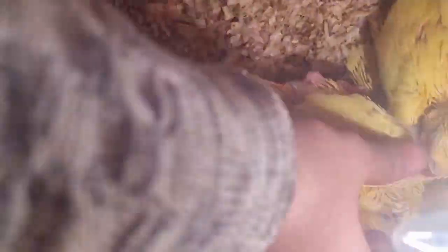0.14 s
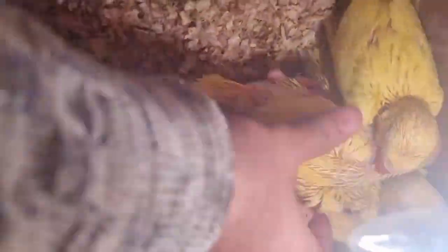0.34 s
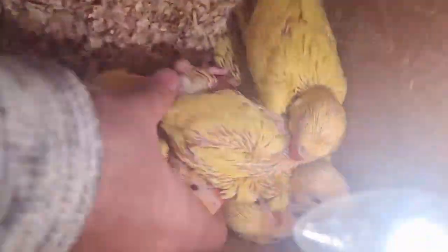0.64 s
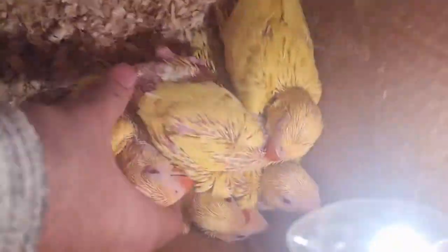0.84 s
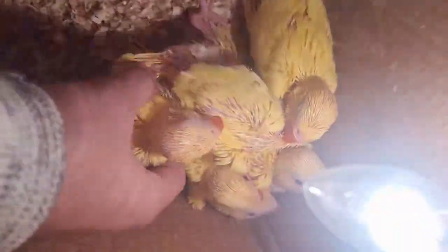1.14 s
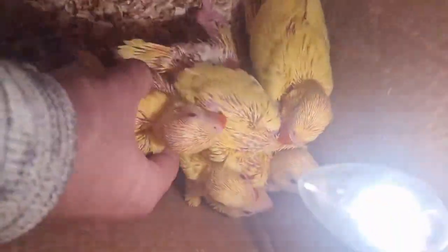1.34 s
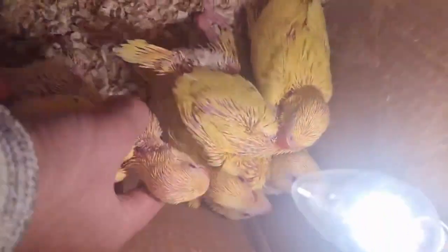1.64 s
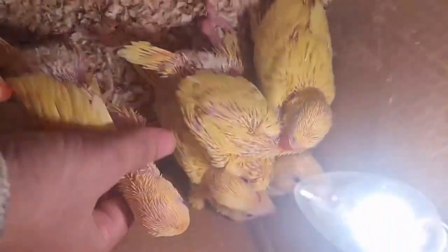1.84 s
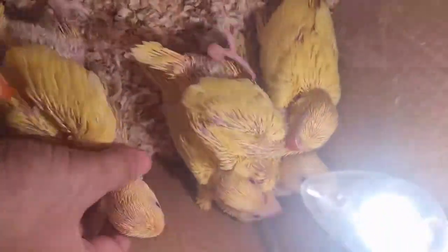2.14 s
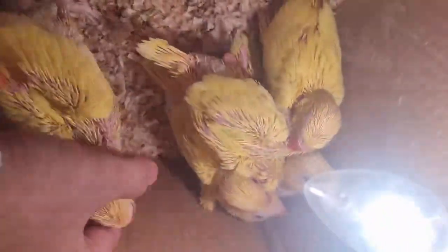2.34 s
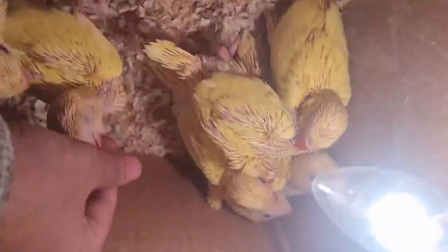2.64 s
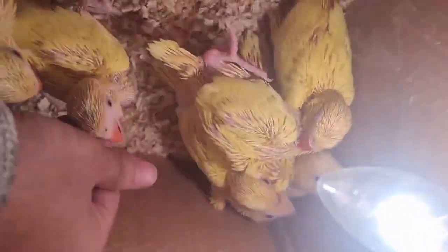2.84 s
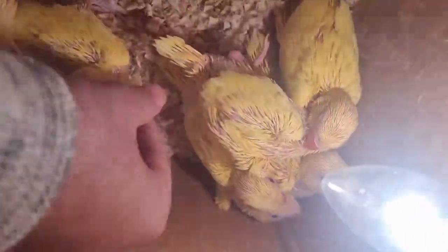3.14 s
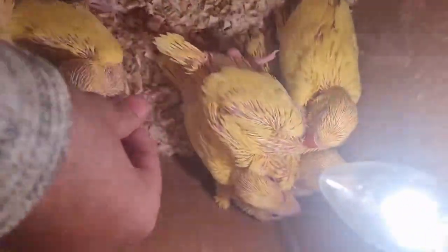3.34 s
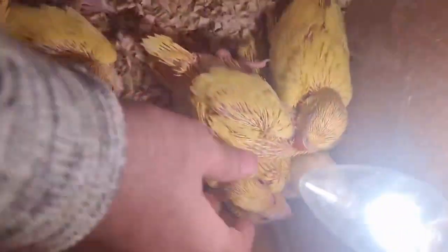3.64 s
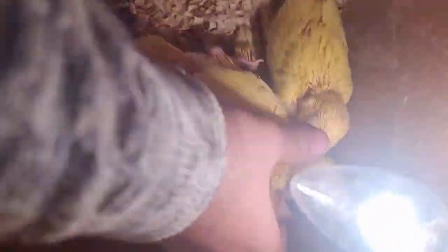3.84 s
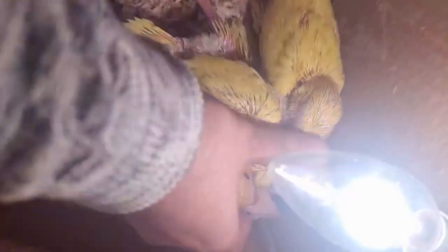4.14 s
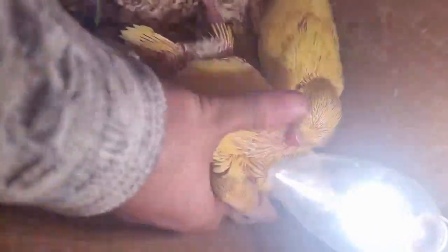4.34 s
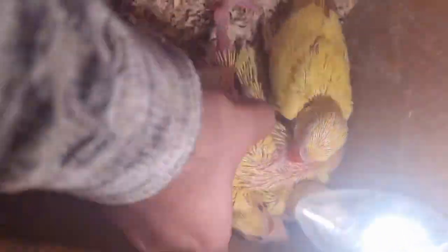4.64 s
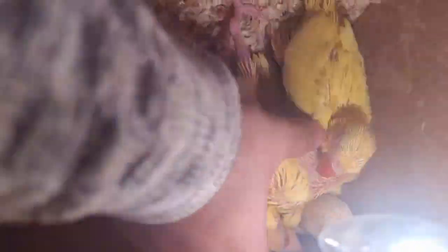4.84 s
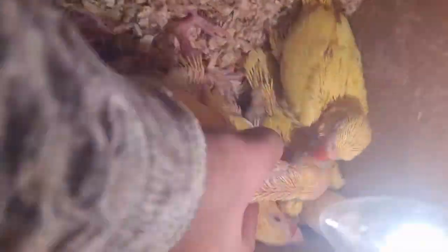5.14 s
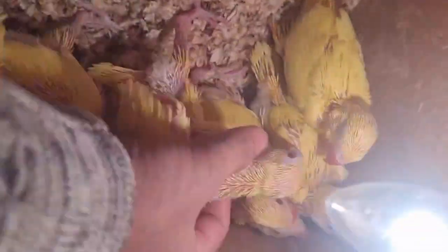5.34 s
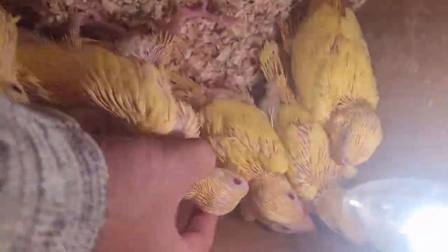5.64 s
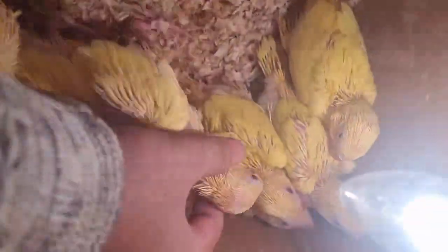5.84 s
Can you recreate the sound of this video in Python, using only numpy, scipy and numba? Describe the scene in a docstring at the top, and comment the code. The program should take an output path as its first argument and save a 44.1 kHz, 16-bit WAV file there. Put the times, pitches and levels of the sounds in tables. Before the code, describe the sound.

Parakeet chicks call harshly, one burst at a time, very near the phone in a small, nearly dry box. The first rasp ends before a cluster of dull wooden thumps and litter ticks. Two longer hoarse, buzzing calls follow, with thin wavering peeps from a nestmate before each. A quieter stretch of faint rustling leads to a thinner squeal breaking into creaks, soft bumps, and a last short call.

```python
"""A parakeet chick rasps close by, then a hand thumps the wooden nest box; hoarse, clear and squealing calls
follow. Chicks: membrane beats and breath through throat and box, with an echoed treble. Nestmate: wavering
near-sine peeps. Hand: decaying low sines, rattling panels and rumble. Shavings: noise bursts and stretches of
grainy noise. Room: quiet coloured noise. A hand-held stereo phone is near."""
import sys
import numpy as np
from scipy import signal
from scipy.fft import rfft, irfft, next_fast_len
from scipy.io import wavfile
from scipy.ndimage import uniform_filter1d
from numba import njit

SR = 44100
rng = np.random.default_rng(int(sys.argv[2]) if len(sys.argv) > 2 else 0)


def natural_amplitude(level_db):
    """Convert a level in decibels to a linear amplitude factor, elementwise."""
    exponent = np.asarray(level_db, float) / 20
    return 10 ** exponent


def inscribe(sig):
    """Save sig as 16-bit PCM at rate SR to the path in sys.argv[1].

    A 1-D sig is mono; a 2-D sig holds one channel per row.
    Samples are clipped to [-1, 1] before scaling.
    """
    pcm = np.round(np.clip(np.atleast_2d(sig).T, -1, 1) * 32767)
    wavfile.write(sys.argv[1], SR, pcm.astype(np.int16))


N = 264159
T = np.arange(N) / SR
SIZE = next_fast_len(N + 8192)
HZ = np.arange(SIZE // 2 + 1) * SR / SIZE


def on_hz(table, hz, column=1):
    """Spectrum column, interpolated linearly on a log-frequency axis."""
    rows = np.array(table, float)
    return np.interp(np.log(hz + 1), np.log(rows[:, 0] + 1), rows[:, column])


def unit(x):
    """Scale to rms 1."""
    return x / np.sqrt(np.mean(x ** 2))


def causal(db):
    """Minimum-phase response of a gain in dB, by folding its cepstrum."""
    cepstrum = irfft(db * np.log(10) / 20, SIZE)
    cepstrum[1:SIZE // 2] *= 2
    cepstrum[SIZE // 2 + 1:] = 0
    return np.exp(rfft(cepstrum))


def band(x, lo_hz, hi_hz):
    """Steep band-pass."""
    return signal.sosfilt(signal.butter(3, [lo_hz, hi_hz], "band", fs=SR, output="sos"), x)


def walk(rate_hz):
    """Random levels held 1 / rate_hz and slewed twice."""
    hold = int(SR / rate_hz)
    steps = np.repeat(rng.standard_normal(N // hold + 1), hold)
    return 1.33 * uniform_filter1d(uniform_filter1d(steps, hold), hold)[:N]


def spans(tables, column, edge_s=0.0013):
    """Gain of a dB column inside each table's span, silent between."""
    out = np.zeros(N)
    for rows in map(np.array, tables):
        fade = np.clip(np.minimum(T - rows[0, 0], rows[-1, 0] - T) / edge_s, 0, 1)
        out += fade * natural_amplitude(np.interp(T, rows[:, 0], rows[:, column]))
    return out


def box(x, wet_db, t60_s):
    """Close walls add a short tail, different at each microphone; it shifts as birds and phone move."""
    t = T[:int(t60_s * SR)]
    turn = 1.2 * walk(6)
    for share in (np.cos(turn), np.sin(turn)):
        tail = rng.standard_normal((2, 8192))[:, :len(t)] * natural_amplitude(-60 * t / t60_s) * np.minimum(t / 0.0084, 1)
        tail = natural_amplitude(wet_db) * tail / np.linalg.norm(tail, axis=1, keepdims=True)
        yield signal.fftconvolve(x * share, tail, axes=1)[:, :N]


# stereo likeness of diffuse sound: f/Hz, left-right correlation
ALIKE = [(60, 0.53), (130, 1), (290, 0.71), (640, -0.31), (1410, -0.49), (3100, 0.014), (6820, 0.06),
         (15000, 0.053)]


def pair(tone, excite):
    """Two unrelated excitations coloured and mixed to left/right: alike in the bass, opposed in the middle."""
    alike = np.clip(on_hz(ALIKE, HZ), -.99, .99)
    shares = np.sqrt([np.ones_like(alike), (1 - alike) / (1 + alike)])
    mid, side = rfft(excite, SIZE) * natural_amplitude(on_hz(tone, HZ)) * shares
    return irfft(np.array([mid + side, mid - side]), SIZE)[:, :N] / np.std(irfft(mid, SIZE))


# room noise spectrum: f/Hz, density/dB per Hz
ROOM_TONE = [(18, -33), (30, 9), (81, -5.5), (249, -0.5), (467, -20.5), (747, -11.5), (1200, -32),
             (1360, -30), (5740, -36), (7080, -30), (7860, -43.5), (14300, -39.5), (15500, -62)]
ROOM_DB = -57.5


def room():
    """Quiet air: coloured noise whose level flickers a little."""
    return pair(ROOM_TONE, rng.standard_normal((2, N))) * natural_amplitude(ROOM_DB + 1.2 * walk(9))


# claws and shavings: t/s, level/dB, treble/dB re level, t60/s, woody body/dB re level
TICKS = [(0.647, -52, -15, 0.012, 17), (0.748, -45.5, -11.5, 0.019, 14.5), (0.9141, -43, -10, 0.0088, 11.5),
         (0.9504, -30.5, -15, 0.0051, 8.5), (1.465, -68, -8, 0.013, 9), (3.1592, -42, -14.5, 0.037, 6),
         (3.176, -39, -12.5, 0.062, 8), (3.2027, -38, -8, 0.019, 14.5), (3.22, -59.5, -25, 0.23, 21),
         (4.575, -72, 6, 0.02, -4), (4.607, -66, -16, 0.014, 5), (4.631, -56, -16, 0.015, 2),
         (4.654, -54.5, -19, 0.012, 8), (4.682, -73, -14, 0.015, 2), (4.7077, -54, -17, 0.017, 6.5),
         (5.094, -60, -12, 0.0087, -18), (5.437, -44, -8, 0.022, 3), (5.5164, -47.5, -1.5, 0.028, 18.5),
         (5.671, -63, -6, 0.04, 0), (5.744, -61.5, 1, 0.027, 15)]
# tick spectrum: f/Hz, density/dB per Hz
TICK_TONE = [(1000, -5.5), (1700, 6.5), (2600, 10.5), (3100, -1.5), (3910, 6.5), (4540, -3.5), (7500, -5.5),
             (9750, -93), (16500, -120)]
# stretches of faint rustling noise: t/s, length/s, level/dB
RUSTLES = [(0, 0.0071, -48.5), (0.603, 0.32, -54.5), (0.98, 0.079, -69.5), (0.99, 0.46, -68),
           (1.581, 0.85, -60.5), (3.11, 0.28, -61), (4.365, 0.068, -60.5), (4.587, 0.13, -58.5),
           (4.854, 0.21, -66), (5.134, 0.59, -58), (5.873, 0.13, -61.5)]
# rustle spectrum: f/Hz, density/dB per Hz
RUSTLE_TONE = [(180, -53.5), (300, -4), (348, 0.5), (1280, -6.5), (1560, -6), (3450, -12.5), (4210, -12),
               (6900, -16.5), (9930, -30), (15500, -21)]
RUSTLE_RISE_DB_PER_S, RUSTLE_FALL_DB_PER_S = 255.5, 124


def shavings():
    """Short scratchy noise bursts, and stretches of faint rustling noise, rising and falling in level."""
    body, top, wood = np.zeros((3, N))
    for s, db, treble_db, t60_s, wood_db in TICKS:
        # each burst rises over a few milliseconds, then decays
        drop = np.where(T > s + .003, (T - s - .003) / t60_s, (s + 0.0024 - T) / 0.015)
        burst = natural_amplitude(db - 60 * drop)
        body += burst
        top += burst * natural_amplitude(treble_db)
        wood += burst * natural_amplitude(wood_db)
    grain_db = np.minimum(3 * rng.exponential(size=N), 11)
    crackle = rng.standard_normal((2, N)) * natural_amplitude(grain_db + 1.2 * walk(400))
    ticks = 1.61 * body * pair(TICK_TONE, crackle)
    ticks += top * unit(band(crackle, 8500, 15400))
    ticks += wood * unit(band(crackle, 260, 1230))
    grains = rng.standard_normal((2, N)) * natural_amplitude(grain_db + 2.4 * walk(20))
    rustle = np.zeros(N)
    for s, length_s, db in RUSTLES:
        rise_db = RUSTLE_RISE_DB_PER_S * np.maximum(s - T, 0)
        fall_db = RUSTLE_FALL_DB_PER_S * np.maximum(T - s - length_s, 0)
        rustle += natural_amplitude(db - rise_db - fall_db)
    return ticks + sum(box(ticks, -6.5, 0.039)) + rustle * pair(RUSTLE_TONE, grains)


# hand against the box: t/s, level/dB, ring f/Hz
THUMPS = [(0.227, -24.5, 105), (0.295, -28.5, 93), (0.879, -19, 85), (0.926, -13, 77), (0.949, -7.5, 88),
          (1.025, -27, 71.4), (3.173, -27, 81), (3.202, -16.5, 65), (3.776, -30, 68.98),
          (5.386, -27.5, 68.43), (5.441, -29.5, 100.5), (5.659, -25, 84.8)]
THUMP_T60_S = 0.11
RUMBLE_DB, SWELL_S, SWELL_WIDTH_S, SWELL_DB = -57, 6.1, 0.13, 8  # swell is centred past the end


def hand():
    """Soft blows ring the box panels low and set them rattling; a rumble runs under them."""
    ring, shake = np.zeros(N), np.zeros(N)
    for s, db, hz in THUMPS:
        t = np.maximum(T - s, 0)
        fade = natural_amplitude(db - 60 * t / THUMP_T60_S) * (1 - np.exp(-t / 0.0048))
        ring += fade * np.sin(2 * np.pi * hz * t)
        shake += np.sqrt(fade)
    rumble = natural_amplitude(3 * walk(14)) * unit(band(rng.standard_normal(N), 42, 125))
    swell_db = SWELL_DB * np.exp(-((T - SWELL_S) / SWELL_WIDTH_S) ** 2)
    rumble = rumble * natural_amplitude(RUMBLE_DB + swell_db)
    rattle = natural_amplitude(-34.0) * shake * unit(band(rng.standard_normal((2, N)), 160, 650))
    return band(ring + rumble, 26, 149) * natural_amplitude(np.array([[1.5], [-1.5]])) + rattle


# nestmate, one table a peep: t/s, pitch f/Hz, level/dB
PEEPS = [
    [(0, 794, -52), (.055, 848, -42)],
    [(1.945, 700, -61), (1.965, 859, -48), (2.005, 880.4, -45.5), (2.03, 943, -48.5), (2.135, 895, -49.5)],
    [(3.235, 860, -51), (3.275, 853, -48), (3.298, 743, -36.5), (3.31, 751, -48.5), (3.322, 825, -39),
     (3.333, 1065, -48), (3.35, 1016, -40.5), (3.374, 1102, -51), (3.388, 980, -49.5), (3.46, 955, -65)],
]
# upper partials at the start of each peep: level/dB re first partial
UPPER_DB = [-9, -3, -3]
# waver of each peep: roughness/0-1
PEEP_ROUGH = [.7, .4, .8]
UPPER_FADE_DB_PER_S, UPPER_FADE_S = 150, 0.038  # fade stops after UPPER_FADE_S


def nestmate():
    """Thin peeps: a wavering near-sine whose upper partials fade early in each peep."""
    rows = np.vstack(PEEPS)
    starts = np.array([p[0][0] for p in PEEPS])
    now = np.searchsorted(starts, T, "right") - 1
    age_s, rough = np.minimum(T - starts[now], UPPER_FADE_S), np.array(PEEP_ROUGH)[now]
    hz = np.interp(T, rows[:, 0], rows[:, 1]) * (1 + .025 * rough * walk(400))
    phase = 2 * np.pi * np.cumsum(hz) / SR
    upper = np.sin(2 * phase) + natural_amplitude(-20) * (np.sin(3 * phase) + np.sin(4 * phase))
    tone = np.sin(phase) + natural_amplitude(np.array(UPPER_DB)[now] - UPPER_FADE_DB_PER_S * age_s) * upper
    peep = np.sqrt(2) * (1 + .5 * rough * walk(250)) * spans(PEEPS, column=2, edge_s=.012) * tone
    peep = peep * natural_amplitude(np.array([[-1.5], [1.5]]))
    return peep + sum(box(peep, -7, .06))


@njit
def membrane(hz, cycles, weak, rough, chance, jitter, shimmer):
    """One beat a cycle, strong only every few cycles; rough cycles vary in length and size."""
    beats, glow = np.zeros(len(hz) + 1), np.zeros(len(hz))
    p, k, since, size = 0., 0, 0., 0.
    for i in range(len(hz)):
        step = hz[i] / SR * np.exp(jitter * rough[i] * chance[k, 0])
        p += step
        if p >= 1:
            p, k, since = p - 1, k + 1, since + 1
            size = np.exp(shimmer * rough[i] * chance[k, 1])
            if since > cycles[i] - chance[k, 2]:
                since = 0.
            else:
                size *= weak[i]
            # split between two samples for sub-sample timing
            beats[i] += size * p / step
            beats[i + 1] += size * (1 - p / step)
        glow[i] = size * np.exp(-3 * p)
    return beats[:-1], glow


# chicks, one table a call: t/s, membrane f/Hz, level/dB
CALLS = [
    [(.056, 759.4, -30.5), (.3, 792.7, -28.5), (.4, 880.7, -29), (.58, 868.6, -31), (.61, 820, -37.5),
     (.625, 793, -29), (.645, 804, -39)],
    [(2.075, 677, -43.5), (2.087, 682, -56)],
    [(2.132, 714.5, -39), (2.25, 743, -33), (2.43, 635.7, -30.5), (2.51, 753.3, -26.5), (2.64, 792, -26),
     (2.78, 720.2, -27.5), (2.93, 693, -27.5), (2.995, 812, -32), (3.035, 663, -33.5), (3.09, 618.4, -38.5),
     (3.116, 537, -43.5)],
    [(3.474, 787, -32), (3.5, 862, -26.5), (3.56, 672, -30.5), (3.78, 589.3, -26.5), (3.88, 567.2, -27),
     (4.01, 480, -30.5), (4.194, 444.4, -32), (4.2, 609, -39.5), (4.33, 571.6, -38.5), (4.36, 546.3, -36.5),
     (4.381, 495, -48.5)],
    [(5.174, 593.3, -37), (5.19, 690, -34.5), (5.203, 651, -34.5), (5.22, 752.7, -34), (5.27, 780.7, -34),
     (5.36, 727.7, -36), (5.4, 724.7, -39), (5.54, 718.7, -39), (5.565, 795, -34.5), (5.6, 835, -34.5),
     (5.64, 784.5, -33.5), (5.655, 708, -34.5), (5.7, 690, -39), (5.745, 561, -48.5)],
    [(5.928, 746, -36.5), (5.96, 683.4, -27.5), (5.99, 715, -31)],
]
# where each call comes from: seat index
CALL_SEAT = [0, 1, 1, 1, 1, 1]
# voicing from each moment on: t/s, voicing name
QUALITY = [(0, "rasp"), (.6, "doubled"), (2, "clear"), (2.1, "hoarse"), (2.45, "rasp"), (2.86, "doubled"),
           (2.99, "clear"), (3.4, "doubled"), (3.515, "buzz"), (4.2, "tired"), (4.33, "clear"),
           (5.1, "catch"), (5.208, "squeal"), (5.345, "catch"), (5.378, "creak"), (5.54, "clear"),
           (5.9, "doubled")]
# ways of voicing: cycles per strong beat, weak beat size/0-1, roughness/0-1
VOICINGS = {"rasp": (2.1, .04, .44), "hoarse": (2.6, .15, .6), "doubled": (2.03, .13, .26),
            "tired": (3, .45, .25), "buzz": (2.06, .02, .35), "catch": (1.35, .5, .25),
            "squeal": (1, 1, .09), "clear": (1, 1, .06), "creak": (5.5, .3, .55)}
# treble of each voicing at EFFORT_DB: level/dB re throat band
TREBLE_DB = {"rasp": -4, "hoarse": 0, "doubled": -3.5, "tired": 9.5, "buzz": -0.5, "catch": 7.5, "squeal":
             8, "clear": 1, "creak": 9.5}
TREBLE_PER_DB, EFFORT_DB = 1.24, -29.5  # treble dB gained per dB of effort over EFFORT_DB
# throat, beak and box walls, one table a seat: f/Hz, level/dB, left minus right/dB, right lead/rad
SEATS = [
    [(150, -21.5, -10, -3), (394, -20.5, -2.5, 0.5), (480, -25.5, -13, 4.5), (544, -3.5, -13, 1.5),
     (820, -6, -7, 1), (1060, -2, -3, 1), (1257, 4.5, -3, 4.5), (1273, -7.5, -21.5, 3.5),
     (1444, -5, -18.5, 4.5), (1585, -12.5, 16, 6), (1650, -35.5, -13, 4), (2210, -21, 1, 4.5),
     (3440, -18, -6, 4), (5500, -30, -4, 4.5), (6900, -35, -10.5, 5)],
    [(151, -41, -9, -1), (381, -15, 5.5, 0.5), (462, -20, 4, 1.9), (537, -3, -9, 1.24),
     (690, -3.5, -10.5, 1.25), (870, 0.5, -3, -2.5), (960, 0.5, -1, -1.5), (1172, -3, 3, -0.2),
     (1180, 0.5, 3.5, 2), (1376, 2, -9.5, 1.4), (1464, 1.5, -4.5, -0.6), (1599, -5, 3, -1.5),
     (1764, -20, -2, -1), (1860, -10, 6.5, 1.66), (2210, -27.5, -13, 2.5), (2580, -19.5, 8.5, -2.5),
     (3830, -22.5, -11, 1.17), (7330, -32.5, 3, 2.03)],
]
# top of the range, alike from every seat: f/Hz, level/dB, left minus right/dB, right lead/rad
TOP = [(6550, -42.5, 1, 1), (10700, -51.5, -2, 0.38), (12050, -30.5, -3.5, 1), (16100, -23.5, 3, 1)]


def chicks():
    """Membrane beats and breath through throat and box; harder effort brings more treble."""
    rows = np.vstack(CALLS)
    hz, level_db = (np.interp(T, rows[:, 0], rows[:, c]) for c in (1, 2))
    now = np.searchsorted([s for s, _ in QUALITY], T, "right") - 1
    cycles, weak, rough = np.array([VOICINGS[v] for _, v in QUALITY])[now].T.copy()
    treble_db = np.array([TREBLE_DB[v] for _, v in QUALITY])[now]
    treble_db = treble_db + TREBLE_PER_DB * (level_db - EFFORT_DB)
    chance = np.c_[rng.standard_normal((N // 20, 2)), rng.random(N // 20)]
    hz = hz * (1 + rough * (.1 * walk(90) + .04 * walk(14)))
    beats, glow = membrane(hz, cycles, weak, rough, chance, .25, .22)
    breath = rng.standard_normal(N)
    voice = beats + breath * (.01 + .25 * rough * (cycles < 1.2))
    # clear and squealing voices are rounder: second partial drops, overtones weaken
    clear = uniform_filter1d(1. * (cycles < 1.2), 400)
    low = voice + (natural_amplitude(-10 * clear) - 1) * band(voice, 990, 2300)
    low = band(low, 91, 2440)
    low = low + .45 * clear * (band(low, 100, 1800) - low)
    # above the throat band each beat is a faint click in a puff of air
    air = (.42 + .35 * rough) * beats + .1 * (1 - .5 * clear) * breath * (glow + .4)
    # a short, drifting subtracted echo gives the treble moving bands
    echo_s = .001 * (1 + .05 * walk(9))
    combed = air - .6 * np.interp(T - echo_s, T, uniform_filter1d(air, size=3))
    high = band(combed, 1970, 10830) * natural_amplitude(treble_db)
    out = 0
    for seat, table in enumerate(near + TOP for near in SEATS):
        tone = causal(on_hz(table, HZ))
        pan_db, lead_rad = on_hz(table, HZ, column=2), on_hz(table, HZ, column=3)
        ports = natural_amplitude(np.array([pan_db, -pan_db]) / 2) * np.exp(.5j * np.array([-lead_rad, lead_rad]))
        # level the throat band, then impose the call levels
        plain = irfft(rfft(low, SIZE) * tone * ports.mean(axis=0), SIZE)[:N]
        loud = np.sqrt(uniform_filter1d(plain ** 2, int(0.056 * SR)) + 1e-12)
        calls = [c for c, s in zip(CALLS, CALL_SEAT) if s == seat]
        effort = spans(calls, column=2, edge_s=0.00098) / loud
        out = out + irfft(rfft((low + high) * effort, SIZE) * tone * ports, SIZE)[:, :N]
    return out + sum(box(out, -11, .035))


def scene():
    """All sources at the two microphones."""
    return room() + shavings() + hand() + nestmate() + chicks()


def low_pass(x):
    """Removes everything above the highest recorded frequency."""
    return signal.sosfilt(signal.butter(12, 15720, fs=SR, output="sos"), x)


def record(dry):
    """The phone cuts the top steeply."""
    cut = signal.sosfilt(signal.ellip(8, .2, 70, 15300, fs=SR, output="sos"), dry)
    return low_pass(cut)


dry = scene()
out = record(dry)
inscribe(out)
```